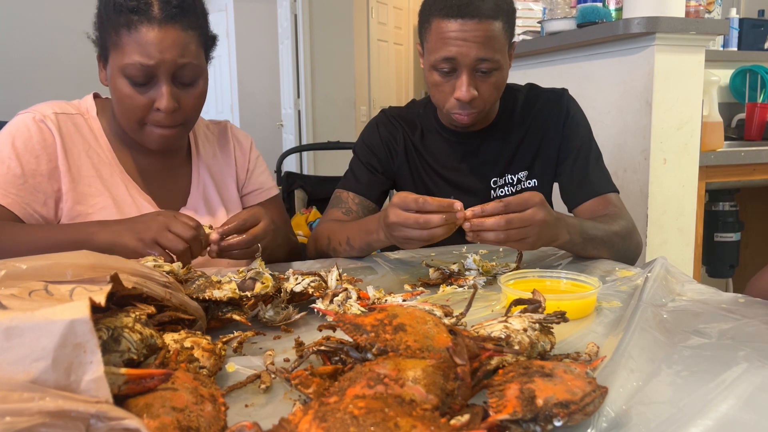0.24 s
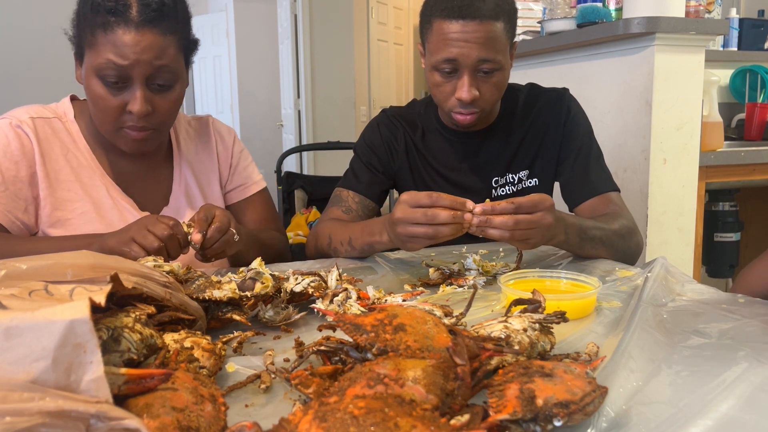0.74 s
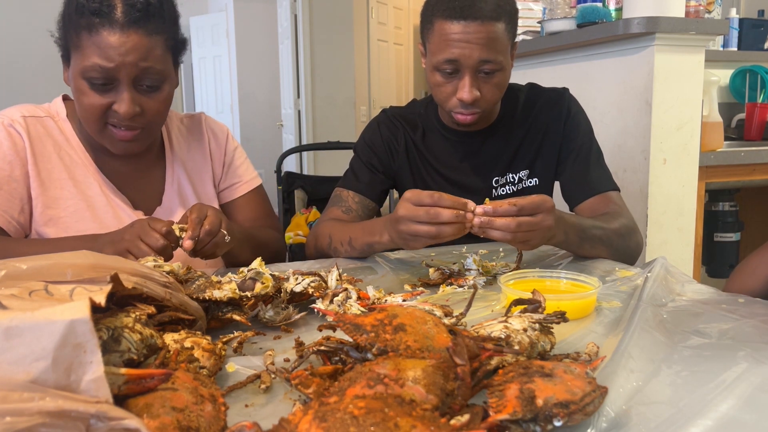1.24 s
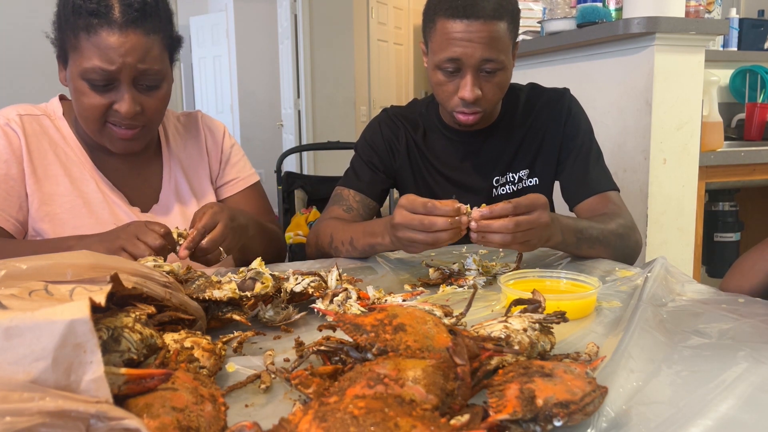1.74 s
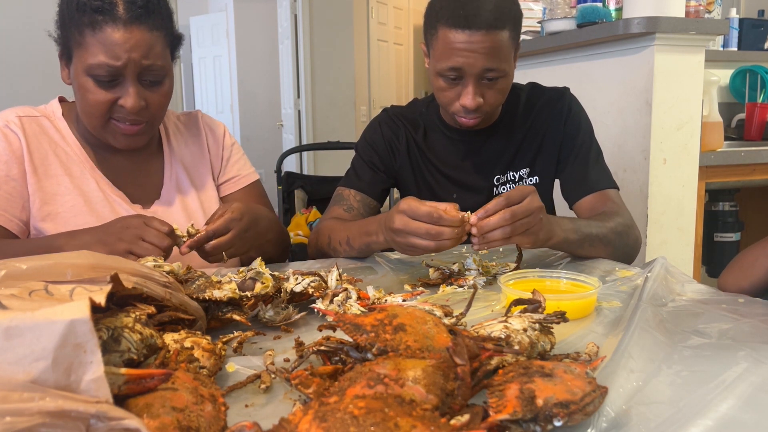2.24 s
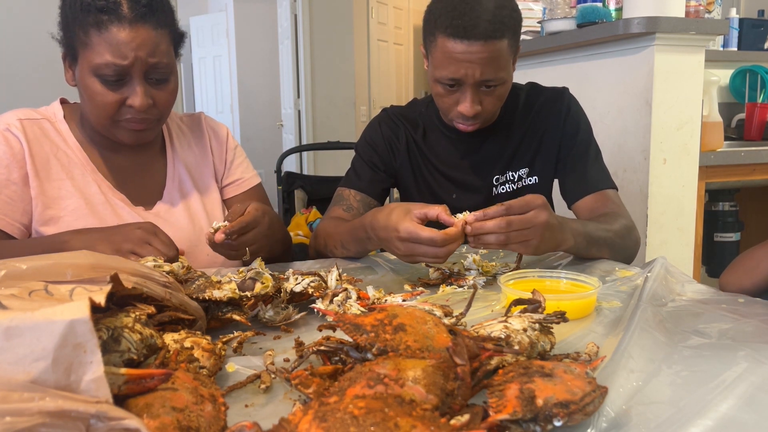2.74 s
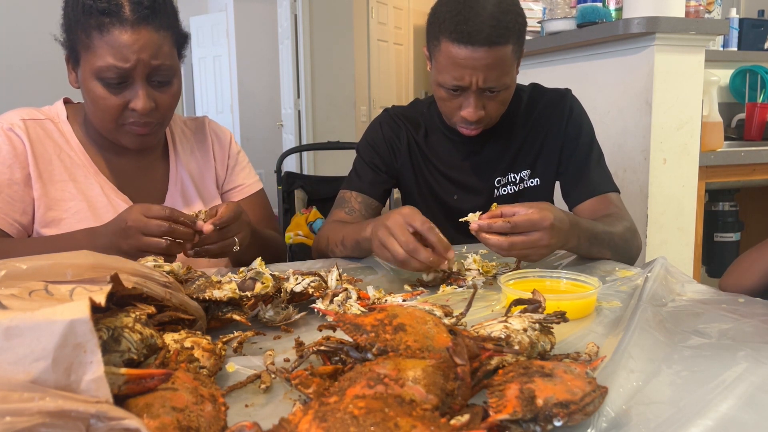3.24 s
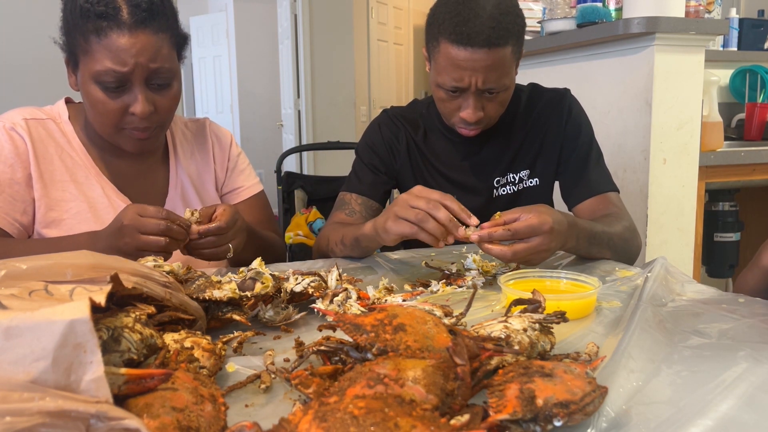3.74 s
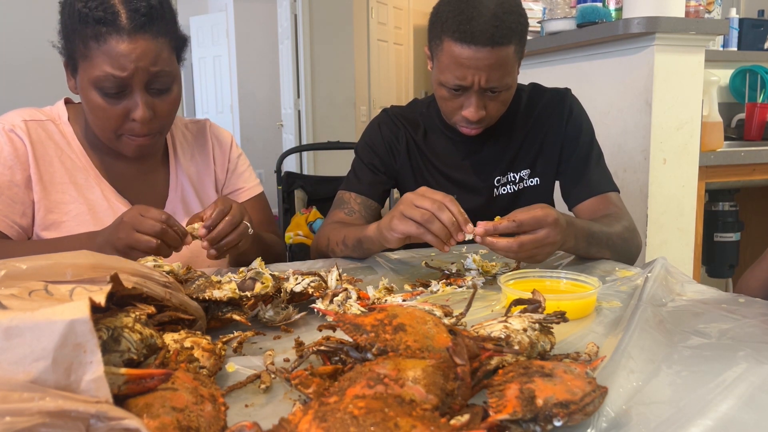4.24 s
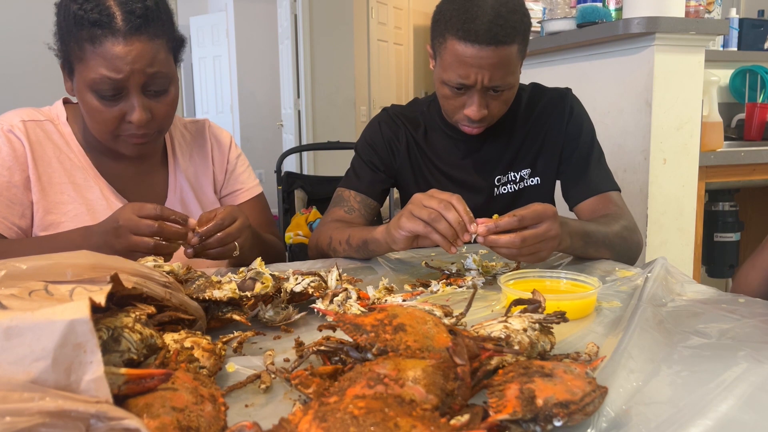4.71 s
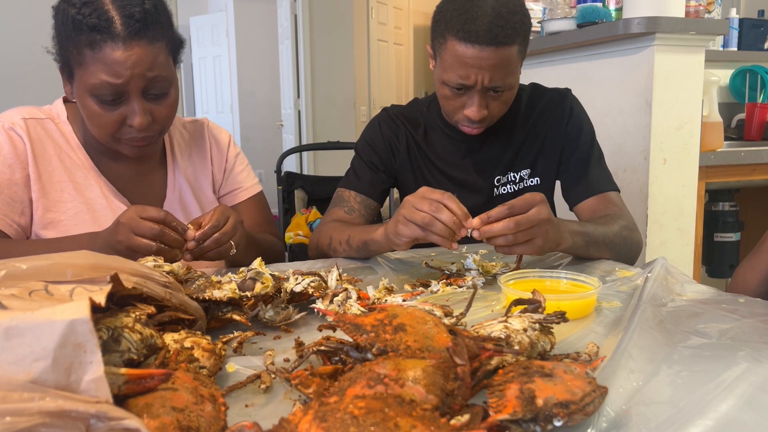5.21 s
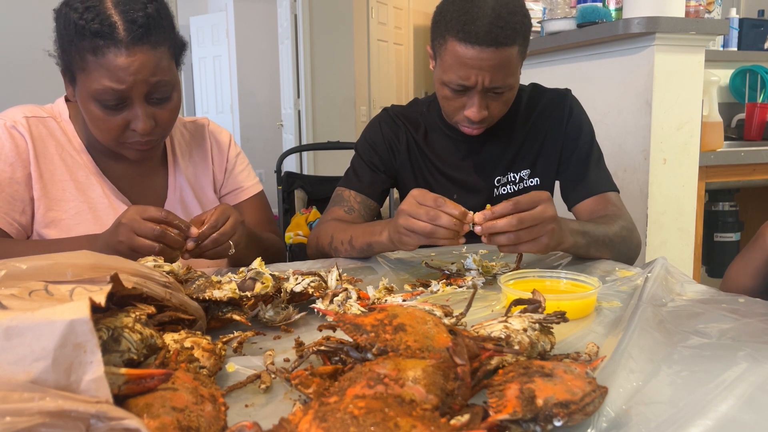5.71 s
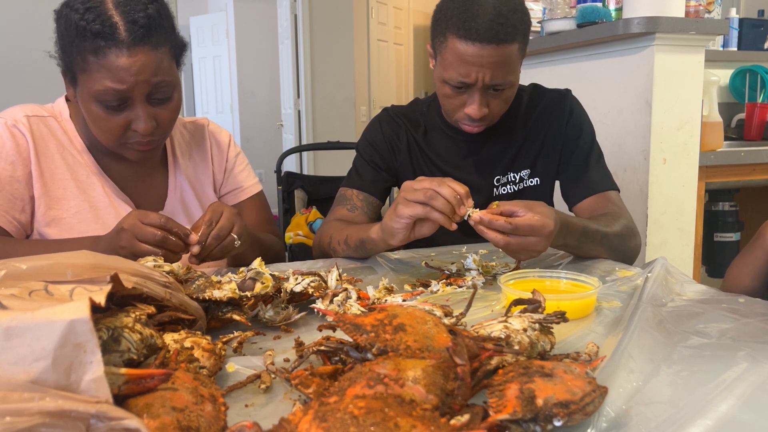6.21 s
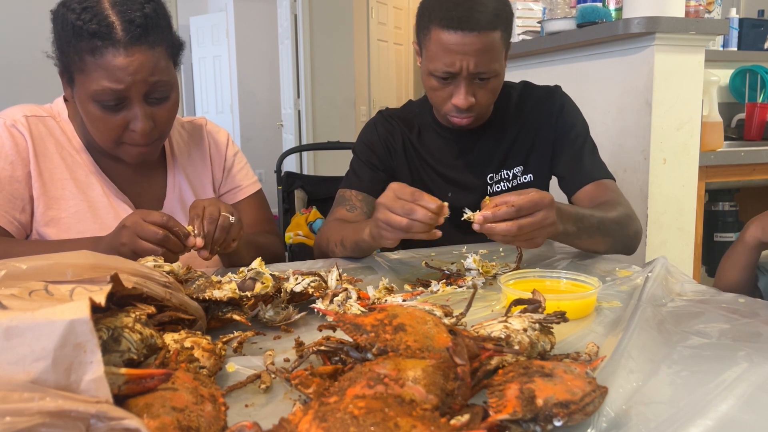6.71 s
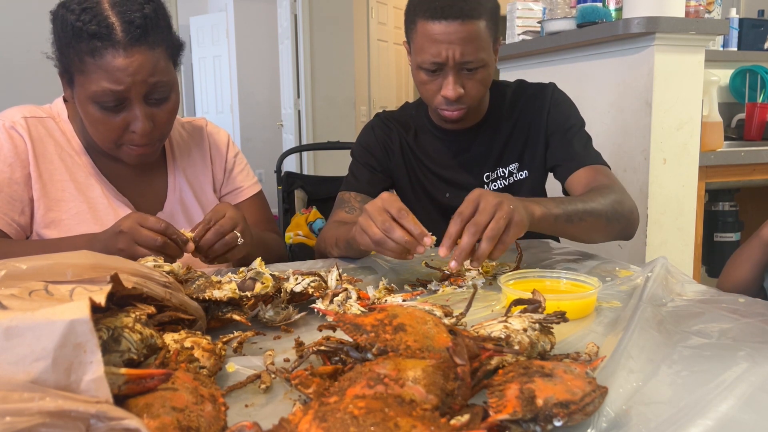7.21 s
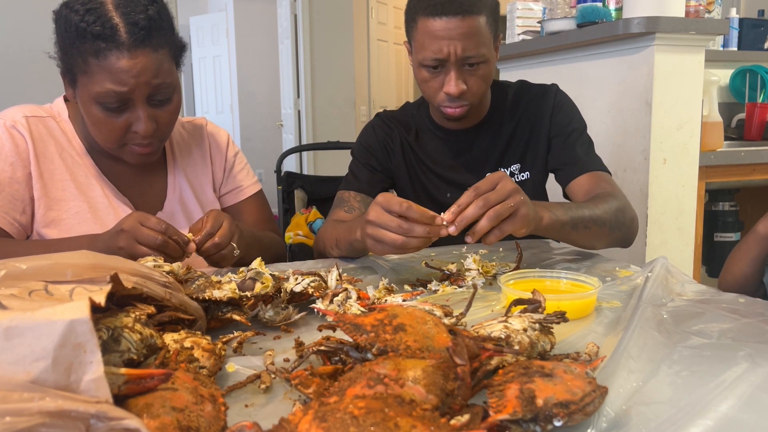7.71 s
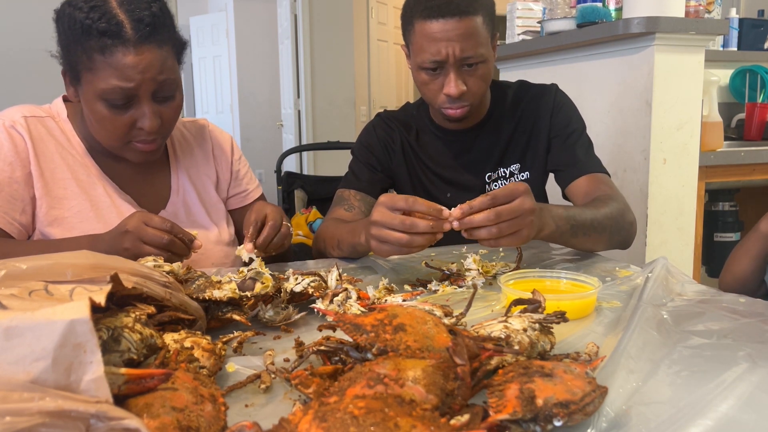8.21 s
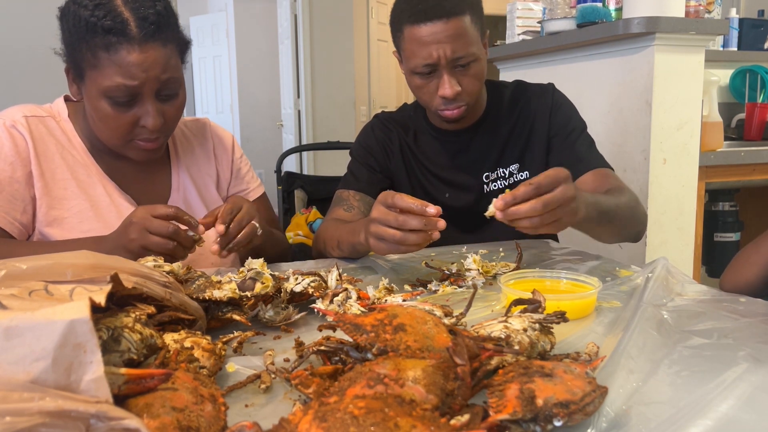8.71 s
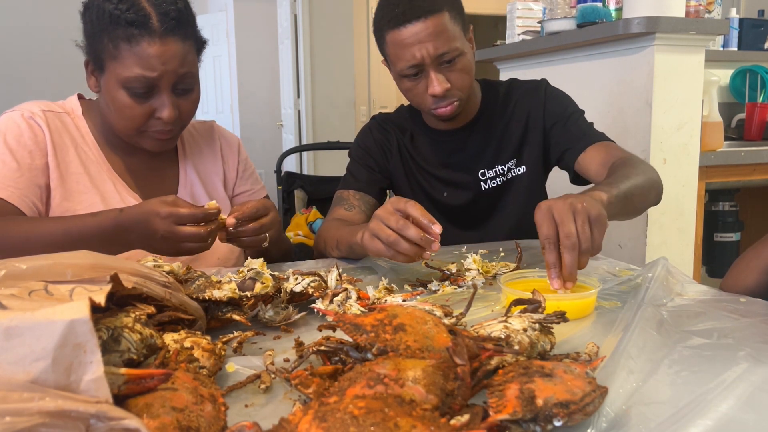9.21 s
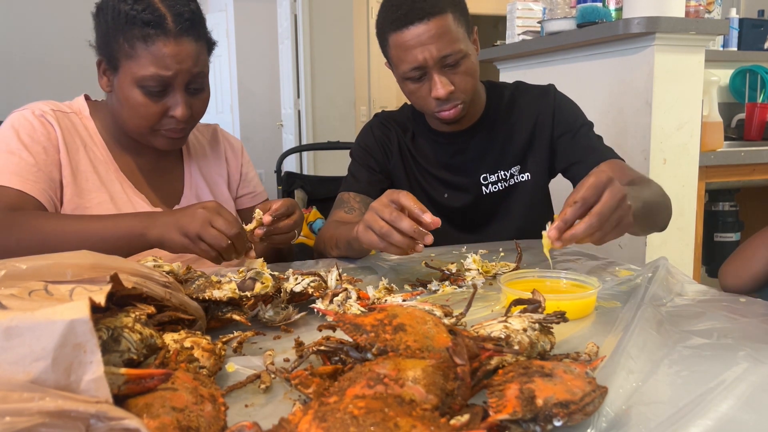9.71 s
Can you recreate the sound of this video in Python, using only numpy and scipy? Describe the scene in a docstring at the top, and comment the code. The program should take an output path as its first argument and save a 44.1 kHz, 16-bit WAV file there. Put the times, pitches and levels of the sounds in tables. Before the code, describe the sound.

Crab shells snap and crackle between fingers, then soft wet picking ticks over a steady refrigerator hum in a small kitchen.

```python
"""A small kitchen, a stereo microphone close to the table where two people crack and pick steamed crabs.
From the start a refrigerator hums and buzzes and fan motors drone in slow beats; a faint low tone fades.
For the first two and a half seconds shells snap in quick clusters. After that fingers pick at the meat
with small wet ticks and rubs, and now and then a bit of shell drops on the table."""
import sys
import numpy as np
from scipy import signal
from scipy.fft import rfft, irfft
from scipy.io import wavfile
from scipy.ndimage import uniform_filter1d

SR = 44100
rng = np.random.default_rng(int(sys.argv[2]) if len(sys.argv) > 2 else 0)


def output_pcm(signal):
    """Save a mono or channel-first signal as 16-bit PCM at the path in sys.argv[1].

    Samples are clipped to [-1, 1] before scaling.
    """
    pcm = np.clip(np.atleast_2d(signal).T, -1, 1) * 32767
    wavfile.write(sys.argv[1], SR, np.round(pcm).astype(np.int16))


N = 438794
T = np.arange(N) / SR
BINS_HZ = np.linspace(0, SR / 2, 1025)

# spectrum of a ringing shell: frequency_hz, relative_db
RING_SPECTRUM = [(600, -36), (1500, -16), (2200, 1), (2700, -0.5), (4000, -0.5), (5200, -3), (7000, -22.5),
                 (12000, -48)]
# spectrum of a splintering shell: frequency_hz, relative_db
SPLINTER_SPECTRUM = [(2000, -34.5), (4500, -3), (5700, -1), (7600, -2), (9000, -3.5), (10500, -5),
                     (12000, -12.5), (13500, -20), (15000, -18.5), (17000, -24)]


def cracks():
    """Each snap mixes the ring of the shell, bright splintering and the pop of the hollow claw."""
    # shell snaps: start_s, ring_db, ring_hz, splinter_db, hollow_db
    snaps = [(0.1862, -57, 2480, -72, -61), (0.3164, -56.5, 2560, -68.5, -55),
             (0.4206, -52.5, 3430, -42.5, -69), (0.4256, -69, 3570, -49, -71), (0.44, -59, 3090, -54, -65),
             (0.446, -51.5, 3390, -49, -60), (0.4512, -51, 4000, -43, -55), (0.4567, -54, 3140, -46, -54),
             (0.754, -66, 2360, -76, -72), (0.877, -57, 2700, -67, -69), (0.8908, -49, 2620, -59, -53),
             (0.9102, -56, 2660, -60, -72), (0.921, -50, 2900, -64, -60), (0.928, -68, 3070, -57.5, -61),
             (1.138, -50.5, 3130, -64, -68), (1.1478, -50, 3080, -53.5, -72), (1.157, -59, 3550, -67, -68),
             (1.1791, -48, 3620, -60, -62), (1.199, -51, 3780, -62, -64), (1.2585, -60, 3650, -64, -64.5),
             (1.274, -55, 2540, -58.5, -59), (1.3698, -40, 2550, -53.5, -48.5),
             (1.379, -57, 3430, -53, -61), (1.4947, -53.5, 4350, -52.5, -70),
             (1.512, -50.5, 3330, -53, -76), (1.554, -65, 2410, -61, -75), (1.602, -51.5, 4530, -64, -55),
             (1.637, -55, 3970, -53, -69), (1.661, -68.5, 3910, -54.5, -70), (1.7047, -57, 3770, -61, -73),
             (1.744, -79, 2490, -59.5, -70), (1.7636, -58, 3550, -49.5, -56), (1.7731, -51, 3900, -45, -72),
             (1.795, -44.5, 2820, -53, -56), (1.8014, -47.5, 4100, -42, -57),
             (2.0886, -62, 2110, -59.5, -59), (2.357, -60, 2720, -86, -65), (2.371, -78, 2970, -66, -64),
             (2.4109, -62, 2630, -66.5, -55.5)]
    # each piece of shell in hand splinters at its own pitch: start_s, pitch_hz
    pieces = [(0, 6900), (.448, 5800), (.7, 7950), (1.45, 7150), (2.0, 8300)]
    ring_shape, splinter_shape = amp(curve(RING_SPECTRUM)), amp(curve(SPLINTER_SPECTRUM))
    out = np.zeros(N)
    for start, ring_db, ring_hz, splinter_db, hollow_db in snaps:
        piece_hz = [hz for since, hz in pieces if since <= start][-1]
        ring = at_level(ring_db, ring_shape * (0.76 + resonance(ring_hz, octaves=0.27)))
        splinter = at_level(splinter_db, splinter_shape * (0.69 + resonance(piece_hz, octaves=0.36)))
        hollow = at_level(hollow_db, resonance(1420, octaves=0.38))
        gain = np.sqrt(ring ** 2 + splinter ** 2 + hollow ** 2)
        add(out, start, fracture(shell(gain, uneven_db=2.3), decay_s=0.0024))
    return out


def fracture(response, decay_s):
    """One break and a dying run of tiny after-breaks ring the shell."""
    t = np.arange(2048) / SR
    force = 0.35 * rng.standard_normal(len(t)) ** 3 * np.exp(-t / decay_s)
    force[0] += 1.5
    colour = np.sqrt(uniform_filter1d(abs(rfft(force)) ** 2, size=40))
    white_force = signal.fftconvolve(force, impulse_response(1 / colour))
    return np.sqrt(.005 * SR) * signal.fftconvolve(white_force, response)  # energy of 5 ms at its level


def shell(gain, uneven_db=2.5):
    """The response of one piece of shell, with its own random resonances."""
    ripple = uniform_filter1d(rng.standard_normal(len(BINS_HZ)), size=12)
    modes = unit(uniform_filter1d(ripple, size=12))
    return impulse_response(gain * unit(amp(uneven_db * modes)))


def wet_ticks():
    """Wet fibres and thin membranes part with tiny high clicks."""
    # ticks of picking: start_s, level_db, pitch_hz, ring_db
    ticks = [(0.3778, -66, 6080, -65), (2.2213, -76.5, 6450, -87), (2.2779, -73, 8140, -74),
             (2.323, -67.5, 8400, -70), (2.3403, -71, 7340, -74), (2.399, -68, 9160, -63),
             (2.7267, -81, 7340, -69), (3.24, -71, 6800, -75), (3.3151, -83, 8080, -70.5),
             (3.758, -68, 6740, -58), (3.7974, -74, 6560, -67), (3.9884, -67.5, 9240, -61),
             (4.5902, -81, 8670, -77), (5.5587, -75, 7060, -77), (5.5639, -76, 7200, -72),
             (5.757, -79, 9250, -84), (6.081, -81, 6440, -67), (6.2305, -81, 7580, -84),
             (6.4558, -72.5, 7400, -62.5), (6.5408, -81.5, 7650, -80), (6.6187, -74.5, 7600, -81),
             (6.7449, -78.5, 6600, -64), (7.317, -81, 7930, -82), (7.4675, -66.5, 7000, -75),
             (7.5023, -74, 7200, -89), (8.0907, -73, 6750, -69), (8.986, -75.5, 6840, -68),
             (9.0287, -71, 7060, -64), (9.444, -82.5, 7070, -74), (9.807, -84, 7590, -77)]
    out = np.zeros(N)
    for start, db, hz, ring_db in ticks:
        click = at_level(db, resonance(hz, octaves=0.3))
        ring = at_level(ring_db, amp(curve(RING_SPECTRUM)))
        add(out, start, fracture(shell(np.hypot(click, ring)), decay_s=0.00038))
    return out


def dropped_bits():
    """Bits of shell land on the covered table with a dull knock and a clack."""
    # landings: start_s, knock_db, clack_db, clack_hz
    landings = [(0.4551, -46, -49, 1790), (2.411, -55.5, -67, 2100), (2.7282, -45, -53.5, 2320),
                (3.342, -45, -71, 1760), (3.3666, -52.5, -59, 2480), (6.4548, -51, -58, 1840),
                (7.0082, -53.5, -59.5, 2680)]
    # spectrum of the table's knock: frequency_hz, relative_db
    table_spectrum = [(150, -20.5), (350, -5.5), (550, 4.5), (900, -6), (1500, -5.5), (2200, -18),
                      (4500, -31.5), (7000, -52), (12000, -69)]
    out = np.zeros(N)
    for start, knock_db, clack_db, clack_hz in landings:
        knock = at_level(knock_db, amp(curve(table_spectrum)))
        clack = at_level(clack_db, resonance(clack_hz, octaves=0.33))
        add(out, start, fracture(shell(np.hypot(knock, clack), uneven_db=0), decay_s=.004))
    return out


def tearing():
    """A pull is a shower of faint crackles of uneven size that dies down as the meat gives."""
    # fingers pulling meat from the shell: start_s, length_s, level_db
    pulls = [(0.183, 0.082, -78), (0.312, 0.082, -83), (0.555, .15, -77.5), (0.738, 0.065, -75),
             (1.63, 0.14, -66), (2.306, 0.045, -64.5), (2.41, 0.058, -69.5), (3.23, .15, -81),
             (4.555, .08, -82), (6.612, .11, -79), (6.74, .14, -80.5), (7.625, .11, -81), (8.962, .13, -79)]
    grip_s, release_s, fade_db = .01, .02, -6
    level, crackle = np.zeros(N), np.zeros(N)
    for start, length, db in pulls:
        t = np.arange(0, length, 1 / SR)
        gate = np.clip(np.minimum(t / grip_s, (length - t) / release_s), 0, 1)
        add(level, start, gate * amp(db + fade_db * t / length))
    gain = amp(curve(SPLINTER_SPECTRUM)) + amp(5 + curve(RING_SPECTRUM))
    for _ in range(8):
        clicks = rng.random(N) < 90 / SR  # about 90 a second in each stream
        sizes = amp(1.8 * np.minimum(rng.exponential(1, N), 4))
        crackle += signal.oaconvolve(clicks * sizes, shell(gain))[:N]
    return level * unit(crackle)


def rubs():
    """Wet fingers, shell and table cover drag and squeak in a haze of small slips."""
    # rubs: middle_s, length_s, level_db, pitch_hz, width_octaves
    strokes = [(0.21, 0.05, -72, 2600, 0.16), (2.753, 0.11, -73, 2800, 0.57), (5.566, .04, -73, 7470, .09),
               (6.776, 0.093, -76, 4200, 0.53), (7.671, 0.12, -67, 2100, 0.088),
               (9.017, 0.17, -75, 4500, 0.75), (9.028, 0.15, -63, 620, 0.23),
               (9.918, .12, -60.5, 620, 0.24)]
    out = np.zeros(N)
    for middle, length, db, hz, octaves in strokes:
        size = int(length * SR)
        slips = rng.standard_normal(SR)[:size] ** 3
        rub = signal.fftconvolve(slips, shell(resonance(hz, octaves)))[:size]
        add(out, middle - length / 2, at_level(db, rub) * np.hanning(size))
    return out


def kitchen(sound, early_db, tail_db):
    """Direct sound at two microphone ports, reflections off the table and walls, and a short tail."""
    # time the room takes to fall 60 dB: frequency_hz, decay_s
    room_decay = [(300, 0.52), (2000, 0.55), (5000, .42), (9000, 0.28), (14000, 0.39)]
    # phase between the ports: frequency_hz, left_lead_rad
    port_phase = [(100, 0), (430, .5), (1000, -1.5), (2700, -.7), (4200, -.8), (5200, -2), (5900, -1.9),
                  (6600, -2.6), (7600, -.8), (9600, .6), (12000, 2.4), (16000, 1.8)]
    size = 26000
    scatter = rng.standard_normal((2, size)) * (rng.random((2, size)) < .3)
    scatter[1] = .6 * scatter[0] + .8 * scatter[1]  # partly alike at both ports
    hz, frame_s, bands = signal.stft(scatter, SR, nperseg=256)
    decay = amp(-60 * frame_s / curve(room_decay, hz)[:, None])
    tail = signal.istft(bands * decay, SR, nperseg=256)[1][:, :size]
    t = np.arange(size) / SR
    tail *= 1 - np.exp(-t / 0.002)
    early = rng.choice([-1., 1.], size) * (rng.random(size) < 1500 / SR)
    early *= np.exp(-t / .016) * (t > .003)
    response = (at_level(tail_db, tail) + at_level(early_db, early)) / np.sqrt(size)
    response[:, 0] += 1  # direct sound
    heard = rfft(signal.oaconvolve(sound[None], response, axes=1)[:, :N])
    lead = curve(port_phase, np.fft.rfftfreq(N, 1 / SR))
    return pan(-.8) * irfft(heard * np.exp(.5j * np.array([lead, -lead])), N)


def machines():
    """Mains hum of the compressor, the beating drone of the motors and their weaker tones."""
    # motor tones: pitch_hz, level_db, left_minus_right_db
    motor_tones = [(103.6, -57.5, 2), (111.6, -56, 2), (120, -58.5, 3), (223.4, -56, 4), (232.9, -62, 4),
                   (407.8, -65.5, 3), (447, -71, 9), (465.7, -72, 7), (511, -72.5, 6), (872.5, -73.2, 5),
                   (1098.5, -79.5, 0), (1222.3, -74, 0), (1280, -82, 0)]
    hum_hz = 240.05
    hum = amp(-43) * pan(6.5) * np.sin(2 * np.pi * hum_hz * T + .03 * wander(3.3))
    tones = np.zeros((2, N))
    for hz, db, side_db in motor_tones:
        level = amp(db + 1.5 * wander(7.5))
        tones += level * pan(side_db) * np.sin(2 * np.pi * hz * (T + 0.0003 * wander(.8)))
    return np.sqrt(2) * (hum + drone() + tones)  # levels are rms


def drone():
    """Three motors at nearly the same speed beat against each other, so the drone swells and sinks."""
    # fan and compressor motors just under mains speed: pitch_hz, level_db, in_step_with_first_s
    motors = [(58.203, -42.9, 0), (58.52, -51.7, 1.04), (59.301, -51.4, .27)]
    first_hz = motors[0][0]
    beating = np.zeros(N)
    for hz, db, in_step in motors:
        turns = first_hz * T + (hz - first_hz) * (T - in_step)
        beating += amp(db) * np.sin(2 * np.pi * turns)
    return amp(0.06 + 0.66 * wander(3.8)) * beating


def ventilation():
    """Steady rush of air, coloured by room modes, alike at both ports in the bass."""
    # rumble and hiss of moving air: frequency_hz, relative_db
    rumble = [(10, -28), (23, -28), (30, -12.5), (38, 4.5), (47, -14.5), (70, -3.5), (95, -11.5),
              (120, -6.5), (172, -3.5), (185, -12.5), (268, -5.5), (283, -11), (440, -17.5), (600, -25)]
    hiss = [(750, -26), (1000, -27), (1700, -29), (2300, -38), (3500, -47), (4800, -51), (5200, -56),
            (6500, -64.5), (7300, -62), (8200, -65), (10000, -68.5), (11500, -76), (12500, -80.5),
            (16000, -85)]
    # likeness of the two ports: frequency_hz, correlation (below zero counts as zero)
    likeness = [(60, 0.8), (92, 0.8), (140, 0.82), (210, 0.84), (330, 0.6), (500, 0.47), (770, -0.55),
                (1170, -0.13), (1790, 0.15), (2740, 0.58), (4190, 0.74), (6410, -0.26), (9810, 0.77),
                (15000, -0.06)]
    # balance of the ports: frequency_hz, left_minus_right_db
    balance = [(60, -1.5), (92, 2.5), (140, -2.5), (210, 9.5), (330, 0.5), (500, 4.5), (770, 4),
               (1170, 2.5), (1790, -6), (2740, -0.5), (4190, -10), (6410, -2.5), (9810, 1), (15000, 6.5)]
    # phase between the ports: frequency_hz, left_lead_rad
    lead = [(0, -1.5), (430, 1.26), (860, -2.5), (1640, 3.0), (2840, -1.2), (4310, 0), (4910, -1.5),
            (5250, -1), (6030, -2.5), (8270, -2.2), (10200, 0.2), (11600, 4.5), (14300, 3), (16200, 0.2)]
    hz = np.fft.rfftfreq(N, 1 / SR)
    left, other = rfft(rng.standard_normal((2, N)))
    shared = np.clip(curve(likeness, hz), 0, 1)
    right = shared * left + np.sqrt(1 - shared ** 2) * other
    right *= np.exp(-1j * curve(lead, hz))
    colour = amp(curve(rumble + hiss, hz)) * pan(curve(balance, hz))
    return at_level(-45, irfft(np.array([left, right]) * colour, N))


def low_tone():
    """A faint low tone, a little to the left, wavers and is gone by 0.6 s."""
    level = amp(-57 + 2 * wander(6.6)) * np.interp(T, [0, .28, .6], [1, .9, 0])
    return pan(4) * np.sqrt(2) * level * np.sin(2 * np.pi * 396 * T + 0.33 * wander(8.4))


def mains_buzz():
    """A thin electrical sizzle on the right, in bursts locked to the 60 Hz mains."""
    cycle = 2 * np.pi * 60 * T
    bursts = np.exp(0.27 * np.cos(cycle) + 0.083 * np.cos(2 * cycle) + 0.12 * np.cos(3 * cycle))
    narrow_peak = 1 / (1 + ((BINS_HZ - 4560) / 110) ** 2)
    ring = impulse_response(narrow_peak + .25 * resonance(4150, octaves=.17))
    sizzle = signal.oaconvolve(bursts * rng.standard_normal(N), ring)[:N]
    return pan(-16) * at_level(-83.5, sizzle)


def amp(db):
    """Decibels to gain."""
    return 10 ** (np.asarray(db) / 20)


def unit(x):
    """Scales to rms 1."""
    return x / np.sqrt(np.mean(x ** 2) + 1e-30)


def at_level(db, x):
    """Scales a sound or spectrum to an rms level."""
    return amp(db) * unit(x)


def curve(points, hz=BINS_HZ):
    """Interpolates a table on a log-frequency axis."""
    point_hz, value = np.transpose(points)
    return np.interp(np.log(hz + 1), np.log(point_hz + 1), value)


def resonance(hz, octaves):
    """Gain curve of a broad resonance around hz."""
    return 1 / (1 + (np.log2((BINS_HZ + 1) / hz) / octaves) ** 4)


def impulse_response(gain):
    """Minimum-phase response of a gain curve: sharp start, ringing after."""
    mirrored = np.r_[gain, gain[-2:0:-1]]
    log_gain = np.log(np.maximum(mirrored, gain.max() * 1e-5))
    spectrum = np.exp(np.conj(signal.hilbert(log_gain)))
    return np.fft.ifft(spectrum).real[:len(gain)]


def wander(rate_hz):
    """Slow random drift of rms 1."""
    lowpass = np.exp(-(np.fft.rfftfreq(N, 1 / SR) / rate_hz) ** 2)
    return unit(irfft(rfft(rng.standard_normal(N)) * lowpass, N))


def pan(side_db):
    """Left and right gains for a level difference; positive is left."""
    return amp(np.array([[.5], [-.5]]) * side_db)


def add(mix, start_s, sound):
    """Adds a sound into the mix at start_s."""
    span = mix[max(round(start_s * SR), 0):][:len(sound)]
    span += sound[:len(span)]


def scene():
    """Hands at work near the microphone, the humming kitchen behind them."""
    snaps = kitchen(cracks() + dropped_bits(), early_db=-5.5, tail_db=-5)
    picking = kitchen(wet_ticks() + tearing() + rubs(), early_db=-5.5, tail_db=-4)
    return snaps + picking + machines() + low_tone() + mains_buzz() + ventilation()


def record(dry):
    """The recorder cuts off the highest treble."""
    edge_hz = 15900
    lowpass = signal.firwin(511, edge_hz, window=("kaiser", 9), fs=SR)
    return signal.oaconvolve(dry, lowpass[None], "same")


dry = scene()
out = record(dry)
output_pcm(out)
```